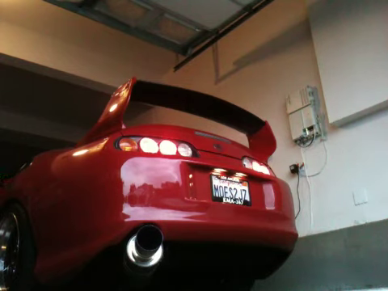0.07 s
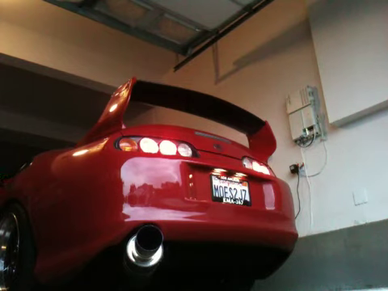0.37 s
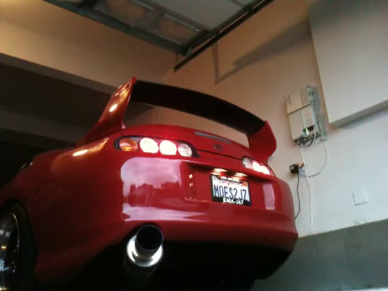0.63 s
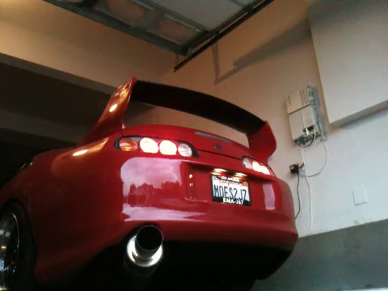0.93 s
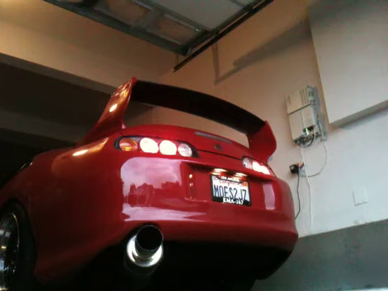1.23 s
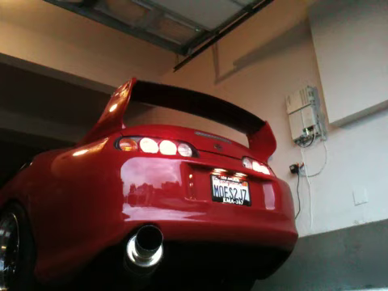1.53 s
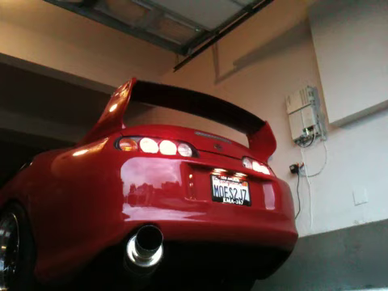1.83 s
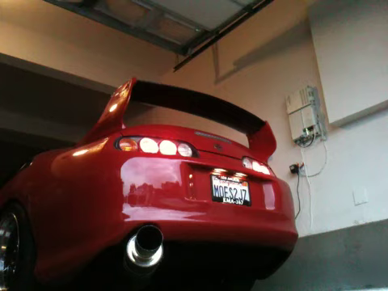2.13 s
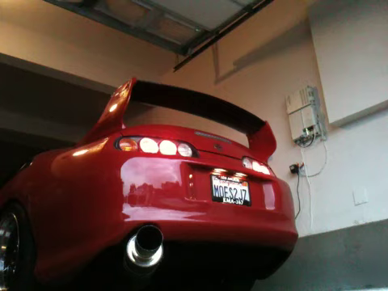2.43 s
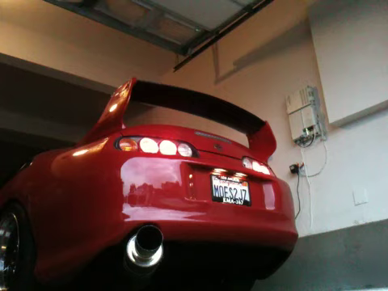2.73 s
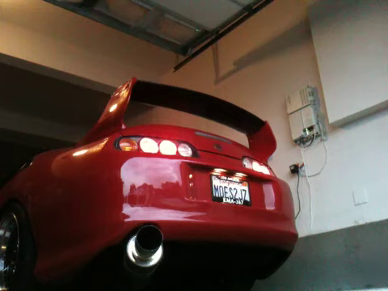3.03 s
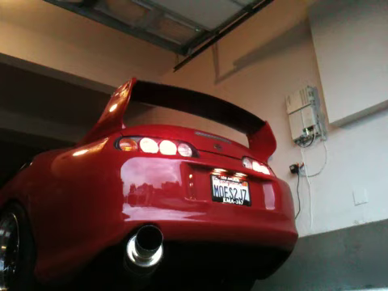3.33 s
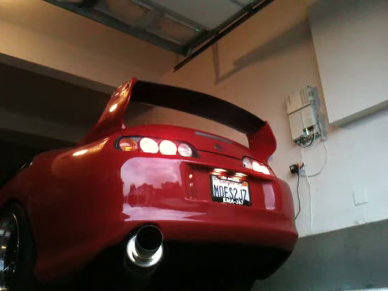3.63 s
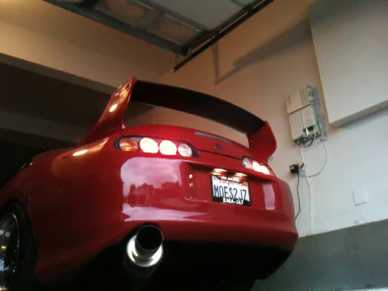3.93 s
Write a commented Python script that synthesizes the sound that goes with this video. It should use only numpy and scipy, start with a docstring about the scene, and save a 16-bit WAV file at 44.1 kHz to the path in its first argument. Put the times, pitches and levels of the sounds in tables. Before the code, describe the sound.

A sports car engine comes off a loud throttle blip, rumbling and rasping with hissing gas and a faint turbo whistle. The exhaust pops and spits as the revs fall, then idles quietly. Heard close behind the tailpipe in a garage.

```python
"""A straight-six sports car in a garage, heard from close behind the tailpipe.
It opens on a blip of the throttle: the exhaust rumbles and rasps, gas hisses with every puff and
the turbo whistles. As the revs fall, the firing orders boom through the resonances of pipe and
room, and heavy firings pop. Just after one second the pipe spits a few times; then the engine
stumbles, catches and settles into a quiet, lumpy idle."""
import sys
import numpy as np
from scipy import signal
from scipy.fft import rfft, irfft
from scipy.io import wavfile
from scipy.ndimage import uniform_filter1d, map_coordinates

SR = 44100
rng = np.random.default_rng(int(sys.argv[2]) if len(sys.argv) > 2 else 0)


def log_audio(samples):
    """Write samples as a 16-bit WAV file to the path given in sys.argv[1]."""
    # one column per channel
    frames = np.atleast_2d(samples).T
    # limit to full scale, then quantise
    limited = np.clip(frames, -1, 1)
    pcm = np.round(limited * 32767).astype(np.int16)
    wavfile.write(sys.argv[1], SR, pcm)


N = 176400
TIME = np.arange(N) / SR

# Room tone. Each row: frequency in Hz, relative level in dB.
AIR_COLOUR = [(25, -9), (60, 0), (200, 6.5), (1000, 3.5), (3000, -8), (6000, -11), (10000, -18),
              (17000, -26)]
# Turbo whistles. Each row: peak time and swell time in seconds, pitch and width in Hz, level in dB.
WHISTLES = [(0.13, 0.31, 6230, 990, -42), (0.079, 0.33, 3220, 790, -41), (0.5, 0.15, 4420, 380, -47.5),
            (1.39, 0.18, 3270, 300, -56), (1.7, 0.33, 2950, 240, -64.5)]
# Rushing gas. Each row: time in seconds, level in dB.
GAS_LEVEL = [(0, -23.5), (.25, -29), (.5, -33), (.8, -36), (1.15, -37), (1.4, -39.5), (1.5, -41.5),
             (1.6, -47.5), (1.92, -49), (2.1, -50.5), (2.7, -56), (3.1, -58), (4, -61)]
# Its colour at speed and off the throttle. Each row: frequency in Hz, relative level in dB.
GAS_FAST = [(60, -15), (300, -2), (600, 9), (850, -0.5), (1000, -19), (1300, -9.5), (1700, -16.5),
            (2400, -21), (3400, -22), (4800, -16.5), (5700, -27), (7500, -36), (10000, -27.5), (12000, -40),
            (17000, -49.5)]
GAS_SLOW = [(60, -12), (300, 3), (600, -0.5), (850, -3), (1000, -3.5), (1300, -2.5), (1700, -9),
            (2400, -13), (3400, -14), (4800, -15.5), (5700, -20), (7500, -24.5), (10000, -29.5),
            (12000, -35), (17000, -44)]
# Spits on the overrun. Each row: start in seconds, level in dB.
SPITS = [(1.125, -42), (1.201, -43), (1.287, -41.5), (1.302, -43), (1.331, -43), (1.346, -43), (1.375, -43),
         (1.422, -40.5), (1.471, -41.5)]
# Heavy firings that pop in the pipe. Each row: start in seconds, level in dB, centre in Hz.
POPS = [(.036, -20, 700), (.117, -17, 560), (.179, -23, 900), (.217, -24, 900), (.272, -19, 520),
        (.352, -21, 400), (.396, -16, 420), (.533, -26, 750), (.724, -21, 560), (.768, -26, 700),
        (.835, -19, 560), (.858, -24, 700), (.919, -25, 850), (.984, -27, 800), (1.054, -27, 700),
        (2.957, -42, 560), (3.051, -42, 580), (3.606, -44, 620), (3.729, -45, 600), (3.778, -44, 600)]
# Two narrow pipe resonances. Each row: pitch in Hz, width in Hz.
RING_MODES = [(572, 24), (808, 50)]
# Their fades. Each row: time in seconds, levels of the lower and the higher in dB.
RING_LEVELS = [(0, -25, -41), (.8, -33.5, -49), (1.3, -38.5, -53.5), (1.7, -51, -54.5), (2.1, -62, -56),
               (2.7, -72, -55), (3.1, -66, -64), (4, -70, -63)]
# Silencer and tailpipe resonances. Each row: pitch in Hz, width in Hz, relative level in dB.
SILENCER_MODES = [(108, 34, -13), (163, 36, -3), (188, 32, -5), (234, 30, 1), (268, 34, -7)]
TAILPIPE_MODES = [(320, 70, -6), (371, 30, 0), (450, 36, -.5), (494, 40, -1), (530, 44, -1.5),
                  (570, 26, .5), (612, 36, -10.5), (700, 130, -15.5)]
# Their fades. Each row: time in seconds, silencer rumble in dB, tailpipe rasp in dB.
PIPE_LEVELS = [(.1, -20, -21.5), (.35, -19.5, -24.5), (.6, -24.5, -23.5), (.9, -24.5, -26.5),
               (1.2, -26.5, -29), (1.5, -27, -34.5), (1.63, -29, -42), (1.93, -28.5, -42.5),
               (2.15, -37.5, -45.5), (2.6, -36.5, -46.5), (2.9, -40.5, -48.5), (3.3, -41.5, -49),
               (4, -43.5, -50.5)]
# Grit in the pipe. Each row: firings per second, share of turbulence from 0 to 1.
ROUGHNESS = [(42, .7), (54, .76), (70, .62), (110, .5), (170, .48)]
# Thump of the stronger cylinders. Each row: time in seconds, level in dB.
LOPE_LEVEL = [(0, -48), (1.2, -42), (1.5, -36), (1.9, -38), (2.15, -45), (2.6, -47.5), (3, -48), (3.3, -47),
              (4, -48.5)]
# Growl tones. Each entry: a multiple of the firing rate.
GROWL_ORDERS = [4 / 3, 5 / 3, 7 / 3, 8 / 3]
# Their fade. Each row: time in seconds, gain in dB.
GROWL_LEVEL = [(0, -22), (.45, -22.5), (.9, -23.5), (1.3, -27), (1.6, -36), (2.2, -50), (4, -56)]
# Their colour. Each row: frequency in Hz, gain in dB.
GROWL_COLOUR = [(70, -35), (120, -17), (135, -20), (150, -6), (185, -5), (210, -13), (235, 0), (272, -2),
                (295, -12), (320, -15), (372, -8), (430, -10)]
# Firing orders, from the fundamental up. Each entry: gain in dB.
ORDER_DB = [0, 0.5, -0.5, -5, -3.5, -15.5]
# Force of the exhaust pulses. Each row: time in seconds, gain in dB.
LOAD = [(0, -6.5), (.035, -9.5), (.08, -7), (.28, -7.5), (.54, -12), (.75, -14), (.95, -16), (1.2, -19),
        (1.5, -22.5), (1.6, -31), (1.82, -33), (1.87, -37), (1.93, -32), (1.99, -39), (2.06, -34),
        (2.13, -36), (2.6, -37), (3, -40), (4, -39)]
# Response of pipe and room. Each row: frequency in Hz, gain in dB.
BOOM_RESPONSE = [(40, -42), (56, -32), (70, -28), (78, -11), (85, -7), (95, -6), (110, -2), (122, -.5),
                 (129, -4), (136, -15), (141, -10), (146, -1), (152, 0), (162, 0), (175, -6.5), (190, -9),
                 (215, -14), (240, -11), (265, -18), (300, -30), (345, -19), (420, -30), (700, -45)]
# Firings that catch hard or nearly miss. Each row: time in seconds, boost or dip in dB.
STUMBLES = [(1.3, -2), (1.53, 5), (1.615, -5), (1.675, -7), (1.7, 4), (1.76, -4), (1.83, 2), (1.885, -5),
            (1.92, 4), (2.04, 3), (2.165, 4.5), (2.27, 2), (3.185, 2), (3.335, 3.5), (3.615, 3.5),
            (3.905, 2.5)]
# The six cylinders in firing order. Each entry: relative strength in dB.
CYLINDER_DB = [0, -9, -5, -.5, -10, -5]
# Engine speed. Each row: time in seconds, firings per second.
FIRING_RATE = [(0, 171.5), (.11, 161), (.28, 146.2), (.5, 127.3), (.75, 108.6), (.93, 95.1), (1.19, 77.6),
               (1.4, 63.5), (1.53, 55.8), (1.78, 55), (1.95, 50), (2.1, 45), (2.3, 42.4), (2.5, 40.2),
               (3, 40.2), (3.3, 41.3), (3.65, 41.8), (4, 41.9)]

WAVER_DB, WAVERS_PER_S = 1.6, 22
FIRST_CYLINDER_S = 3.036  # a moment when cylinder one is due to fire


def from_db(db):
    """Decibels to gain."""
    return 10 ** (np.asarray(db) / 20)


def rms_one(x):
    """Scale to unit rms."""
    return x / np.sqrt(np.mean(x ** 2) + 1e-20)


def even(x, size=11025):
    """Ride the level to 1 over a window of `size` samples, leaving faster peaks standing."""
    return x / np.sqrt(uniform_filter1d(x ** 2, size) + 1e-12)


def in_time(rows):
    """Each column of a timed table as a curve, sample by sample."""
    s, *columns = np.transpose(rows)
    return [np.interp(TIME, s, c) for c in columns]


def at_hz(points, hz):
    """Gain of an EQ curve at given frequencies."""
    f, db = np.transpose(points)
    return from_db(np.interp(np.log(hz + 1e-9), np.log(f), db))


def coloured(x, spectrum):
    """Apply an EQ curve and scale to unit rms."""
    return rms_one(irfft(rfft(x) * at_hz(spectrum, np.arange(N // 2 + 1) * SR / N), N))


def band(x, low_hz, high_hz, order):
    """Band-pass."""
    return signal.sosfilt(signal.butter(order, [low_hz, high_hz], "band", fs=SR, output="sos"), x)


def resonate(x, hz, width_hz):
    """A steep resonance: two passes through a resonator of this width, gain 1 at the peak."""
    r = np.exp(-np.pi * width_hz / SR)
    b = np.array([1, 0, -1]) * (1 - r * r) / 2
    a = [1, -2 * r * np.cos(2 * np.pi * hz / SR), r * r]
    return signal.lfilter(b, a, signal.lfilter(b, a, x))


def waver():
    """Smooth random wander with a spread near 1."""
    points = rng.standard_normal(int(N / SR * WAVERS_PER_S) + 64)
    return map_coordinates(points, [TIME * WAVERS_PER_S], order=2, mode="nearest")


def burst(s, db, decay_s):
    """Envelope with an instant attack and an exponential decay."""
    return from_db(db) * (TIME >= s) * np.exp(-np.minimum(np.abs(TIME - s) / decay_s, 20))


def room_tone(db=-58):
    """A steady bed of soft, dark air."""
    return from_db(db) * coloured(rng.standard_normal(N), AIR_COLOUR)


def garage(x, t60_s=.35, wet_db=-9, predelay_s=.008):
    """Direct sound plus a short diffuse tail off the walls."""
    t = TIME[:SR // 2]
    tail = rng.standard_normal(len(t)) * from_db(-60 * t / t60_s) * (t > predelay_s)
    return x + from_db(wet_db) * signal.fftconvolve(x, tail / np.linalg.norm(tail))[:N]


def turbo():
    """Breathy whistles swell and fade, lower as the turbo runs down."""
    out = np.zeros(N)
    for peak_s, swell_s, hz, width, db in WHISTLES:
        swell = from_db(db) * np.exp(-((TIME - peak_s) / swell_s) ** 2)
        out += swell * rms_one(resonate(rng.standard_normal(N), hz, width))
    return out


def gas(puffs, pulsing=.58, midpoint_s=.1, crossfade_s=.54):
    """Escaping gas hisses with every puff and changes colour as the engine slows."""
    flow_db, = in_time(GAS_LEVEL)
    jet = even(garage(rng.standard_normal(N) * (1 - pulsing + pulsing * puffs)))
    slow = .5 + .5 * np.tanh((TIME - midpoint_s) / crossfade_s)
    return from_db(flow_db) * ((1 - slow) * coloured(jet, GAS_FAST) + slow * coloured(jet, GAS_SLOW))


def spits_and_pops():
    """The pipe spits bright cracks on the overrun; heavy firings make duller pops."""
    bright = rms_one(band(rng.standard_normal(N), low_hz=1500, high_hz=7000, order=3))
    cracks = bright * sum(burst(s, db, decay_s=.003) for s, db in SPITS)
    white = rng.standard_normal(N)
    pops = sum(burst(s, db, decay_s=.004) * even(resonate(white, hz, hz / 2), size=220)
               for s, db, hz in POPS)
    return garage(cracks + band(pops, low_hz=200, high_hz=1400, order=4))


def ring(puffs):
    """Turbulence sings in two narrow pipe resonances: the lower leads at speed, the higher at idle."""
    return sum(from_db(db) * even(resonate(puffs * rng.standard_normal(N), hz, width))
               for db, (hz, width) in zip(in_time(RING_LEVELS), RING_MODES))


def pipe(kicks, puffs, rate, modes, preroll=4410):
    """Kicks and turbulent puffs keep the exhaust's resonances ringing into the garage, at level 1."""
    rough = np.interp(rate, *np.transpose(ROUGHNESS))
    drive = (1 - rough) * kicks + rough * puffs * rng.standard_normal(N)
    drive = np.pad(drive, (preroll, 0), mode="reflect")  # already running at the start
    ringing = sum(from_db(db) * resonate(drive, hz, width) for hz, width, db in modes)
    return even(garage(ringing[preroll:]), size=6000)


def lope(kicks, thump_hz=165, thump_s=.0044):
    """Each kick lands as a short dull thump, the heavy ones by far the hardest."""
    lope_db, = in_time(LOPE_LEVEL)
    t = np.arange(-SR // 50, SR // 50) / SR
    thump = np.cos(2 * np.pi * thump_hz * t) * np.exp(-.5 * (t / thump_s) ** 2)
    return from_db(lope_db) * even(signal.fftconvolve(kicks ** 2, thump, "same"))


def growl(rate, cycles):
    """Unequal cylinders add clean tones between the firing orders, sliding down with the revs."""
    growl_db, = in_time(GROWL_LEVEL)
    tones = np.zeros(N)
    for k in GROWL_ORDERS:
        gain = from_db(WAVER_DB * waver()) * at_hz(GROWL_COLOUR, k * rate)
        tones += gain * np.cos(2 * np.pi * (k * cycles + rng.random()))
    return np.sqrt(2) * from_db(growl_db) * tones


def boom(rate, cycles):
    """Firing orders swell and dip through the resonances of pipe and room; higher ones waver more."""
    load_db, = in_time(LOAD)
    orders = np.zeros(N)
    for k, db in enumerate(ORDER_DB, 1):
        gain = from_db(db + WAVER_DB * np.sqrt(k - 1) * waver()) * at_hz(BOOM_RESPONSE, k * rate)
        orders += gain * np.cos(2 * np.pi * k * cycles + rng.uniform(-1.92, 1.5))
    return np.sqrt(2) * from_db(load_db) * orders


def stumble(width_s=.015):
    """Gain of the low exhaust note as single firings catch hard or nearly miss."""
    return from_db(sum(db * np.exp(-((TIME - s) / width_s) ** 2) for s, db in STUMBLES))


def firings(rate, cycles, jitter_cycles=.018, spread_db=1.6, puff_s=.011):
    """Each firing gives a kick, uneven by cylinder and by chance, and a puff of gas that dies away."""
    due = np.flatnonzero(np.diff(np.floor(cycles))) + 1
    timing, force = rng.standard_normal((len(due), 2)).T
    cylinder = np.floor(cycles[due]).astype(int) % len(CYLINDER_DB)
    onsets = np.clip(due + (jitter_cycles * SR / rate[due] * timing).astype(int), 0, N - 1)
    kicks = np.zeros(N)
    kicks[onsets] = from_db(np.array(CYLINDER_DB)[cylinder] + spread_db * force)
    squashed = kicks ** .14  # puffs vary far less than kicks
    puffs = signal.lfilter([1], [1, -np.exp(-1 / (puff_s * SR))], squashed)
    return even(kicks), even(puffs)


def scene():
    """Engine speed drives the exhaust note; turbo, spits and room tone are mixed around it."""
    rate, = in_time(FIRING_RATE)
    cycles = np.cumsum(rate) / SR  # one cycle per firing
    cycles -= np.interp(FIRST_CYLINDER_S, TIME, cycles)
    kicks, puffs = firings(rate, cycles)
    rumble_db, rasp_db = in_time(PIPE_LEVELS)
    rumble = from_db(rumble_db) * pipe(kicks, puffs, rate, SILENCER_MODES)
    rasp = from_db(rasp_db) * pipe(kicks, puffs, rate, TAILPIPE_MODES)
    air = room_tone()
    note = stumble() * (boom(rate, cycles) + growl(rate, cycles) + lope(kicks) + rumble)
    return (note + rasp + ring(puffs) + gas(puffs) + turbo() + spits_and_pops() + air)[None]


def record(dry):
    """Clip peaks at full scale, then cut the very top of the treble."""
    lowpass = signal.cheby2(12, 70, 17200, fs=SR, output="sos")
    return signal.sosfilt(lowpass, np.clip(dry, -1, 1))


dry = scene()
out = record(dry)
log_audio(out)
```